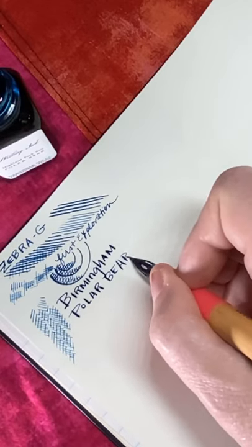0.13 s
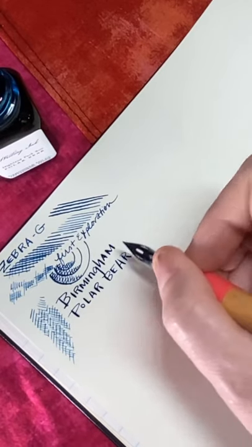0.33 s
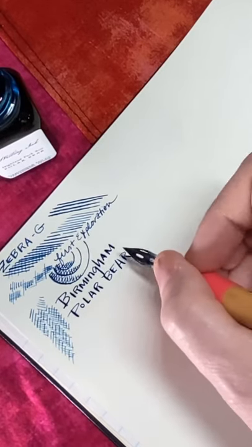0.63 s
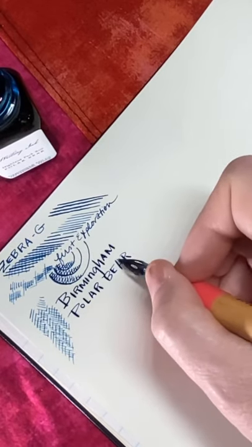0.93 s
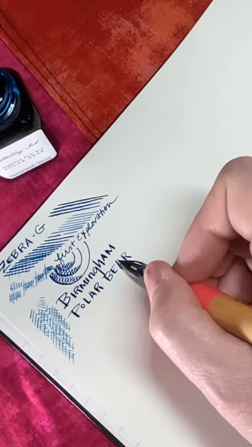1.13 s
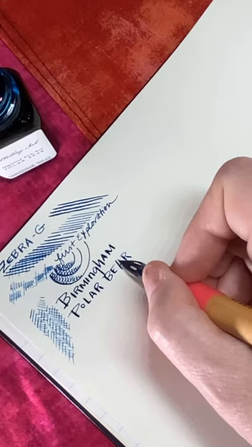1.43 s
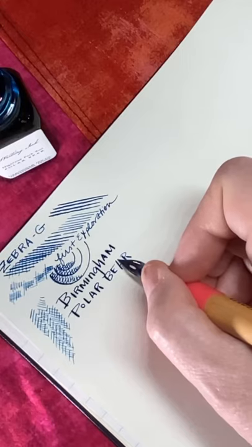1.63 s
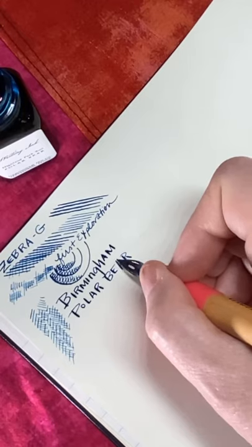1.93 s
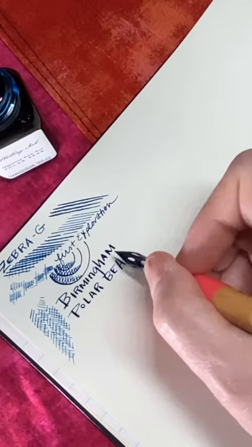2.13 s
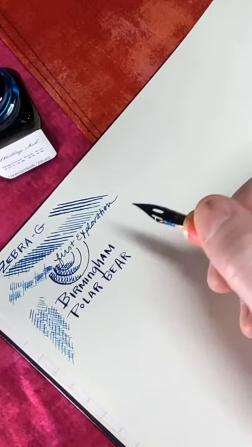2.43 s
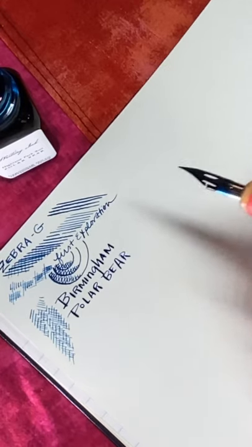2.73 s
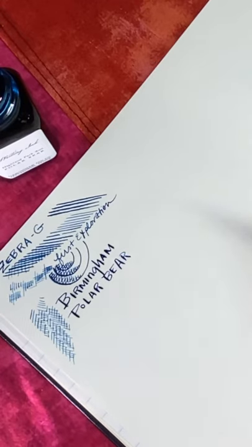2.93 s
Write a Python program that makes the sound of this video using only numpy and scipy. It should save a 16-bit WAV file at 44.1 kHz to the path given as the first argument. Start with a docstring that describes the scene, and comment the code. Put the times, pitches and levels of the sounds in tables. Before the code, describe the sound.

Close up at a desk, a steel nib rasps briefly and clicks on paper, the hand thumps softly, strokes continue sparsely, then something hard, probably an ink bottle, rattles as the hand slides away over low rumble.

```python
"""A nib rasps at once over paper, above a low hum: a steel dip pen writes short strokes on a pad.
Fibre impulses excite the rasp and hiss; noise bursts and ringing modes make its taps and bright clicks.
The hand thumps softly as decaying sines, then slides away as filtered noise.
Something hard, probably the ink bottle, rattles and knocks once more: modes and noise through the desk.
A diffuse, decaying tail adds a small room; noise and wavering partials form the background."""
import sys
import numpy as np
from scipy import signal
from scipy.fft import rfft, irfft, next_fast_len
from scipy.io import wavfile

SR = 44100
rng = np.random.default_rng(int(sys.argv[2]) if len(sys.argv) > 2 else 0)


def to_wav(sig):
    """Store sig (one row per channel, or 1-D mono) as 16-bit WAV at the path in sys.argv[1].

    Samples outside -1..1 are clipped; the rate is SR.
    """
    pcm = np.clip(np.atleast_2d(sig), -1, 1) * 32767
    pcm = np.round(pcm).astype(np.int16)
    wavfile.write(sys.argv[1], SR, pcm.T)  # frames by channels


N = 136269
T = np.arange(N) / SR  # time [s]
PADDED = next_fast_len(N + SR // 2)
PADDED += PADDED % 2  # even transform length
HZ = np.maximum(np.arange(PADDED // 2 + 1) * SR / PADDED, 1)  # kept above 0 for logarithms


def from_db(db):
    """Level to amplitude ratio: 20 dB is a factor of ten."""
    return 10 ** (np.asarray(db) / 20)


def rms_one(x):
    """Normalise the mean power to one."""
    return x / np.sqrt(np.mean(x ** 2) + 1e-20)


def at_hz(points, hz):
    """Interpolate a spectrum along logarithmic frequency."""
    f, value = np.transpose(points)
    return np.interp(np.log(hz), np.log(f), value)


def filtered(x, response):
    """Linear filtering: multiply the spectrum by a frequency response."""
    return irfft(rfft(x, PADDED) * response, PADDED)[..., :N]


def colour(x, points):
    """Minimum-phase filter by cepstral folding; white noise keeps its level."""
    cepstrum = irfft(np.log(rms_one(from_db(at_hz(points, HZ)))))
    cepstrum[1:PADDED // 2] *= 2
    cepstrum[PADDED // 2 + 1:] = 0
    return filtered(x, np.exp(rfft(cepstrum)))


def resonance(x, hz, q):
    """Second-order resonance with unit gain at its peak."""
    q = max(q, hz / (SR / 2) * 2)
    b, a = signal.iirpeak(hz, q, fs=SR)
    return signal.lfilter(b, a, x + 1e-18)


def dying(s, t60):
    """Exponential decay from onset s, falling 60 dB in t60 seconds."""
    return (T >= s) * from_db(-60 * np.clip((T - s) / t60, 0, 10))


def cracks(hits, t60):
    """Dense vibration as noise, with a short rise and exponential decay at each hit."""
    rise_s = 0.0014
    noise = rng.standard_normal(N)
    envelope = sum(from_db(db) * np.clip((T - s) / rise_s, 0, 1) * dying(s, t60) for s, db in hits)
    return noise * envelope


def ring(hits, modes):
    """Modal synthesis: each hit excites damped resonators with slightly uneven strengths."""
    spread_db = 1  # standard deviation
    s, db = np.transpose(hits)
    out = np.zeros(N)
    chance = rng.standard_normal((len(s), len(modes)))
    for k, (hz, mode_db, t60) in enumerate(modes):
        blows = np.full(N, 1e-18)
        blows[(s * SR).astype(int)] = from_db(db + mode_db + spread_db * chance[:, k])
        radius = np.exp(-np.log(1000) / (t60 * SR))
        w = 2 * np.pi * hz / SR
        mode = signal.lfilter([0, np.sin(w)], [1, -2 * radius * np.cos(w), radius * radius], blows)
        out += (-1) ** k * mode  # neighbouring modes start in opposite phase
    return out


def through_desk(x, delay_s):
    """Bending-wave dispersion: delay falls as 1 / sqrt(frequency), equal to delay_s at 1 kHz."""
    return filtered(x, np.exp(-4j * np.pi * delay_s * np.sqrt(1000 * HZ)))


def in_room(x, wet_db):
    """Direct sound plus a diffuse tail, different at each side and decaying band by band."""
    # Reverberation decay: (frequency [Hz], t60 [s])
    room_t60 = [(150, 0.31), (500, 0.28), (1400, 0.2), (3700, 0.18), (9700, 0.19), (16000, 0.12)]
    onset_s = 0.0031
    t = T[:SR // 2]
    white = rfft(rng.standard_normal((2, len(t))))
    hz = np.arange(len(t) // 2 + 1) * SR / len(t)
    edges = np.geomspace(60, SR / 2, 10)
    tail = 0
    for low, high in zip(edges, edges[1:]):
        band = irfft(white * (hz >= low) * (hz < high), len(t))
        tail = tail + band * np.exp(-np.log(1000) * t / at_hz(room_t60, np.sqrt(low * high)))
    tail = tail * (1 - np.exp(-(t / onset_s) ** 2))
    tail = rms_one(tail) / np.sqrt(len(t))
    return x + from_db(wet_db) * filtered(x, rfft(tail, PADDED))


def from_desk(x, wet_db):
    """Interaural-style time difference: the desk's sound reaches the right side first."""
    left_lag_s = .00024
    left, right = in_room(x, wet_db)
    return np.array([filtered(left, np.exp(-2j * np.pi * HZ * left_lag_s)), right])


def room_tone():
    """Partly coherent noise is the ventilation's rumble; amplitude-modulated partials are the hum."""
    # Air noise spectrum: (frequency [Hz], relative level [dB])
    air_colour = [(15, -30), (25, -14), (35, -8), (55, 4), (100, 1), (135, -3.5), (200, -6.5), (270, -7),
                  (350, -23), (450, -21.5), (780, -23), (950, -29.5), (2000, -38.5), (5000, -46),
                  (11500, -49), (14000, -55), (16000, -68)]
    # Coherence of the two sides: (frequency [Hz], left-right likeness [0 to 1])
    likeness = [(60, 0.89), (200, .9), (500, 0.13), (1500, 0.23), (6000, 0.28)]
    # Hum partials: (multiple of the hum frequency, level [dB re hum level])
    partials = [(1, -1), (2, -11), (7, -39.5), (8, -29.5), (10, -26)]
    # The hum swells and sinks: (time [s], level [dB])
    hum_level = [(0.0, -53), (0.04, -50), (0.91, -54.5), (0.95, -67), (1.0, -49), (1.76, -57.5),
                 (2.13, -48), (2.57, -60), (2.67, -45), (2.87, -65.5), (3.03, -56), (3.09, -63)]
    air_db, hum_hz, waver_depth = -52, 80.3, 0.15  # depth is a fraction of the amplitude, rms
    mid, side = colour(rng.standard_normal((2, N)), air_colour)
    alike = np.clip(at_hz(likeness, HZ), 0, 1)
    common = filtered(mid, np.sqrt((1 + alike) / 2))
    opposed = filtered(side, np.sqrt((1 - alike) / 2)) * [[1], [-1]]
    air = common + opposed
    waver = rms_one(filtered(rng.standard_normal((len(partials), N)), np.exp(-HZ / 2)))
    hum = 0
    for (k, db), w in zip(partials, waver):
        tone = np.sin(2 * np.pi * (k * hum_hz * T + rng.random()))
        hum = hum + np.sqrt(2) * from_db(db) * (1 + waver_depth * w) * tone
    return from_db(air_db) * air + from_db(np.interp(T, *np.transpose(hum_level))) * hum


def hand():
    """Damped sines are soft thumps on the pad; friction noise is skin sliding over paper."""
    # Thumps: (time [s], level [dB], pitch [Hz], t60 [s])
    thump_table = [(0.563, -38.5, 194, 0.16), (.982, -30, 210.5, 0.052), (.999, -33.5, 154, 0.088),
                   (1.001, -32.5, 85.4, 0.074)]
    # The hand slides off: (time [s], level [dB])
    slide_level = [(2.25, -99), (2.45, -82.5), (2.6, -77), (2.72, -58.5), (2.79, -57.5), (2.87, -56),
                   (2.98, -64.5), (3.09, -70.5)]
    # Friction spectrum: (frequency [Hz], relative level [dB])
    slide_colour = [(300, 14), (1000, 4), (2500, 16), (5000, 11), (7500, 13.5), (11000, 10), (16000, 5)]
    attack_s = 0.0024
    thumps = 0
    for s, db, hz, t60 in thump_table:
        envelope = dying(s, t60) * np.clip((T - s) / attack_s, 0, 1)
        thumps = thumps + from_db(db) * envelope * np.sin(2 * np.pi * hz * (T - s))
    friction = colour(rng.standard_normal((2, N)), slide_colour)
    slide = from_db(np.interp(T, *np.transpose(slide_level))) * friction
    return in_room(thumps, wet_db=-5.5) + slide


def bottle_knocks():
    """Impact excitation: four quick bounces and a last knock drive one crack and one set of modes."""
    # Hard knocks on the desk: (time [s], level [dB])
    knocks = [(2.6359, -33), (2.6598, -35.5), (2.679, -35), (2.7044, -36), (2.8169, -32.5)]
    # Modes of bottle and desk: (frequency [Hz], relative level [dB], t60 [s])
    body_modes = [(200.5, -17, 0.22), (336.6, -9, 0.12), (418, -5, 0.037), (489, -3, 0.071),
                  (586, -18, 0.15), (675, -20.5, 0.17), (793, -11, 0.12), (843, -17, 0.05),
                  (926, -21, 0.12), (1185, -6.5, 0.057), (1267, -8.5, 0.042), (1582, -16, 0.068),
                  (2120, -12, 0.079), (2220, -9, 0.034), (2523, -12, 0.048), (2927, -10, 0.038),
                  (3420, -16.5, 0.052), (3682, -11, 0.098), (4960, -20.5, 0.055), (5980, -14.5, 0.052),
                  (7320, -13.5, 0.085), (7750, -10, 0.068)]
    # Crack spectrum: (frequency [Hz], relative level [dB])
    crack_colour = [(150, 11), (450, 13.5), (950, 6.5), (1550, 1.5), (1850, -2), (2300, 5.5), (4000, 2),
                    (4500, -7.5), (5500, 3.5), (6600, -4.5), (7600, 4), (9500, -6), (12000, -13.5),
                    (16000, -16)]
    crack_db, crack_t60_s, bending_delay_s = 3, .034, 0.001995
    blows = np.zeros(N)
    for s, db in knocks:
        blows[int(s * SR)] += from_db(db)
    burst = colour(cracks([(0, crack_db)], crack_t60_s), crack_colour)
    crack = through_desk(filtered(blows, rfft(burst, PADDED)), bending_delay_s)
    body = through_desk(ring(knocks, body_modes), bending_delay_s)
    return in_room(crack, wet_db=-7) + from_desk(body, wet_db=-13)


def metallic_clicks():
    """Light touch, then noise and steel modes in a snap; a hard surface nearby reflects a narrow band."""
    # Bright clicks: (time [s], level [dB])
    clicks = [(1.3042, -37), (1.8687, -30.5), (2.8983, -29.5)]
    # Snap spectrum: (frequency [Hz], relative level [dB])
    snap_colour = [(500, -24), (1400, -34), (2500, -14.5), (5000, -12.5), (6800, -11), (7500, 3.5),
                   (8150, 7), (8900, -5), (9700, 2), (10500, -8), (11800, -13), (13500, -16), (15500, -11)]
    # Modes of the ringing steel: (frequency [Hz], relative level [dB], t60 [s])
    steel_modes = [(7100, -16.5, 0.029), (7900, -14, 0.048), (8290, -4, 0.024), (10356, -11, 0.012),
                   (10970, -14, 0.014)]
    snap_t60_s, lead_s, lead_db = .011, 0.0057, -13
    echo_s, echo_db, echo_hz, echo_q = .0128, 1.5, 7300, 7.6
    touches = [(s - lead_s, db + lead_db) for s, db in clicks]
    snap = colour(cracks(clicks + touches, snap_t60_s), snap_colour) + ring(clicks, steel_modes)
    echo = np.interp(T - echo_s, T, resonance(snap, echo_hz, echo_q))
    return in_room(snap, wet_db=-1) + from_db(echo_db) * echo


def nib_ticks():
    """Impulsive release: short noise bursts as the nib catches on single fibres."""
    # Tiny dry ticks: (time [s], level [dB])
    ticks = [(.1303, -47), (.157, -65), (.3495, -48.5), (.5555, -50.5), (1.392, -56), (1.473, -53.5),
             (1.618, -61), (2.124, -57), (2.596, -50)]
    # Tick spectrum: (frequency [Hz], relative level [dB])
    tick_colour = [(500, 0), (2000, -0.5), (4000, -4), (7000, -15.5), (11000, -9.5), (16000, -9)]
    return in_room(colour(cracks(ticks, t60=0.016), tick_colour), wet_db=-2)


def nib_taps():
    """Impact on a damped body: the nib lands with a dull crack and the pad's modes ring briefly."""
    # The nib is set down: (time [s], level [dB])
    taps = [(.7328, -37), (.8255, -42.5), (1.2722, -39.5)]
    # Modes of the pad on the desk: (frequency [Hz], relative level [dB], t60 [s])
    pad_modes = [(166, -1, 0.08), (246, -11, 0.13), (329, -1, 0.1), (396, 1, 0.059), (500, -23, 0.057),
                 (573, -14, 0.12), (674, -14, 0.091), (800, -14, 0.089), (1084, -16, 0.045),
                 (1256, -5, 0.053), (1720, -1, 0.018), (2340, -7, 0.011), (2900, -8, 0.012)]
    # Crack spectrum: (frequency [Hz], relative level [dB])
    tap_colour = [(300, -1), (1200, 2), (2700, -0.5), (3500, -16), (7000, -18.5), (10000, -34),
                  (16000, -49.5)]
    crack_db, crack_t60_s = 2.5, .016
    pad = through_desk(ring(taps, pad_modes), delay_s=0.001786)
    crack = from_db(crack_db) * colour(cracks(taps, crack_t60_s), tap_colour)
    crack_leaning_left = in_room(crack, wet_db=-6.5) * from_db([[2], [-2]])
    return from_desk(pad, wet_db=-10.5) + crack_leaning_left


def fibres():
    """Random impulse train: the nib snaps over paper fibres in dense clicks of uneven size."""
    fibres_per_s, spread_db = 2500, 3  # mean rate; scale of the exponential spread
    sizes = from_db(spread_db * np.minimum(rng.exponential(1, N), 4)) * rng.choice([-1, 1], N)
    return rms_one(sizes * (rng.random(N) < fibres_per_s / SR))


def nib_strokes():
    """Source and filter: fibre impulses make paper rasp and steel hiss under each stroke's pressure."""
    # Strokes, levels ahead of the mix:
    # (time [s], length [s], rasp level [dB], rasp centre [Hz], hiss level [dB])
    strokes = [(0.0, 0.0054, -58.5, 2060, -44.5), (0.007, 0.029, -47.5, 2310, -59),
               (0.045, .028, -63, 2180, -73), (0.122, 0.045, -57.5, 1550, -66.5),
               (0.342, 0.0063, -52, 2640, -44.5), (0.356, 0.032, -54.5, 3330, -52.5),
               (0.543, 0.012, -55, 1390, -72), (0.55, 0.021, -46.5, 1460, -80),
               (0.953, 0.051, -59, 1170, -92), (0.978, 0.03, -49, 630, -99),
               (1.15, 0.039, -72.5, 1990, -93), (1.295, 0.034, -58, 2810, -51.5),
               (1.345, 0.022, -56, 776, -62), (1.381, 0.038, -58.5, 1300, -69),
               (1.461, 0.032, -56.5, 1140, -71.5), (1.506, .03, -61, 900, -88),
               (1.606, 0.022, -59, 1170, -71.5), (1.873, 0.043, -62.5, 680, -56),
               (2.119, 0.02, -59, 2300, -83), (2.132, 0.022, -60, 770, -92), (3.02, 0.027, -61, 2260, -60)]
    # Spectra of paper and steel: (frequency [Hz], relative level [dB])
    rasp_colour = [(200, 18), (600, 10), (1500, -1), (3400, -3), (4300, -7.5), (7000, -7), (10000, 0),
                   (16000, -20)]
    hiss_colour = [(1000, -33), (3500, -7.5), (6000, -2.5), (7500, 1), (9300, 9.5), (11000, -3),
                   (12500, -3), (15500, -5)]
    attack_s, release_s, easing_db_per_s, rasp_q = 0.0031, 0.0092, 110, 2.06
    paper = colour(fibres(), rasp_colour)
    steel = colour(fibres(), hiss_colour)
    rasp, hiss = 0, 0
    for s, length, rasp_db, hz, hiss_db in strokes:
        attack = np.clip((T - s) / attack_s, 0, 1)
        release = np.exp(-np.clip((T - s - length) / release_s, 0, 20))
        # the level falls steadily through the stroke, about its middle
        easing = from_db(-easing_db_per_s * (np.clip(T - s, 0, length) - length / 2))
        pressure = attack * release * easing
        rasp = rasp + from_db(rasp_db) * pressure * rms_one(resonance(paper, hz, rasp_q))
        hiss = hiss + from_db(hiss_db) * pressure * steel
    return from_db(-6) * in_room(rasp, wet_db=-2.5) + from_db(-3.5) * in_room(hiss, wet_db=-8)


def scene():
    """Superposition: pen, hand and bottle add to the room tone."""
    background = room_tone()
    pen = nib_strokes() + nib_taps() + nib_ticks() + metallic_clicks()
    return background + pen + hand() + bottle_knocks()


def record(dry):
    """Stereo pickup: level differences by band, phase-turned coherent treble, and a steep low-pass."""
    # Balance of the sides: (frequency [Hz], left minus right [dB])
    balance = [(60, -0.5), (130, -2), (260, -5), (500, 0), (1000, 0), (1800, -0.5), (2600, 3.5),
               (4000, 0.5), (5200, 6), (7000, -2.5), (16000, -3.5)]
    join_hz, in_phase_hz, turn_hz, cutoff_hz = 6400, 6850, 4250, 16000
    left, right = rfft(dry, PADDED) * from_db(at_hz(balance, HZ) * np.array([[.5], [-.5]]))
    # share of the right side's power taken from the left signal
    joined = np.clip((HZ - join_hz) / 500 + .5, 0, 1) * .96
    turn = 2 * np.pi * (HZ - in_phase_hz) / turn_hz
    turn = turn - np.sin(2 * turn) / 2  # lingers in phase and in opposite phase
    right = np.sqrt(1 - joined) * right + np.sqrt(joined) * left * np.exp(1j * turn)
    low_pass = 1 / np.sqrt(1 + (HZ / cutoff_hz) ** 160)
    return irfft(np.array([left, right]) * low_pass, PADDED)[:, :N]


dry = scene()
out = record(dry)
to_wav(out)
```